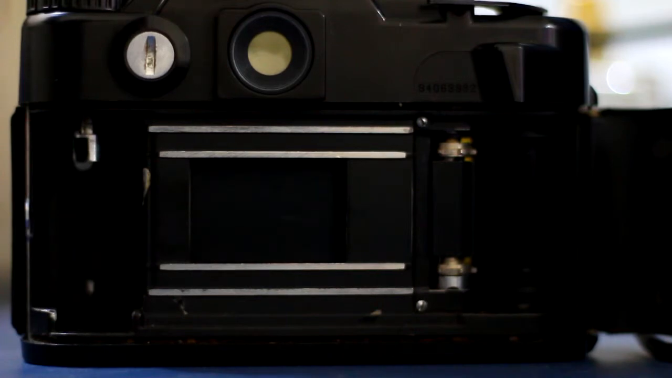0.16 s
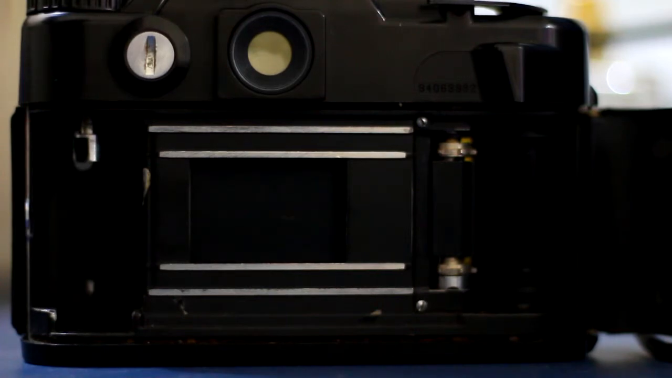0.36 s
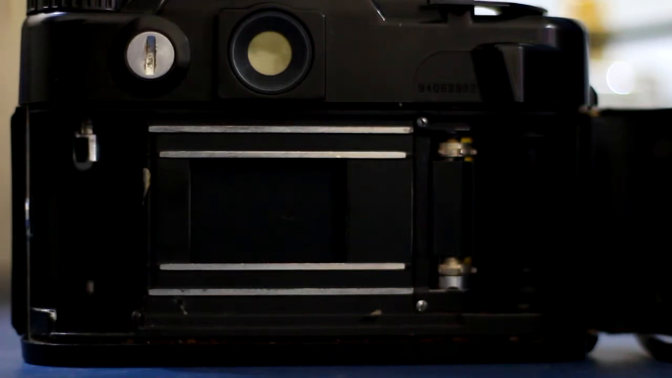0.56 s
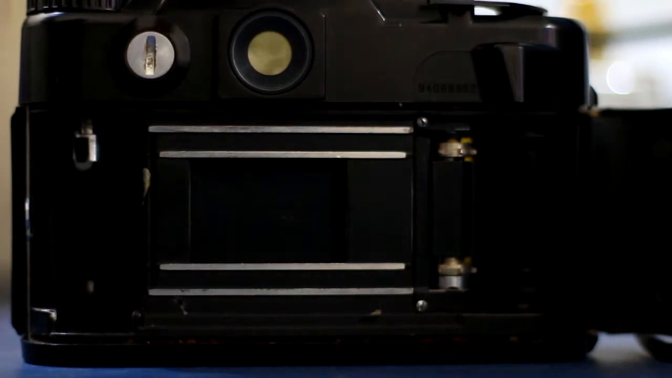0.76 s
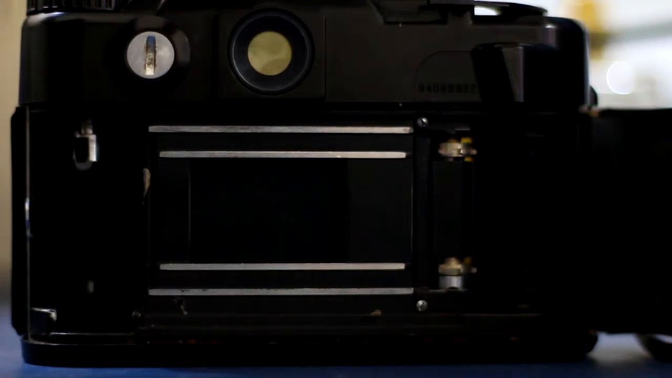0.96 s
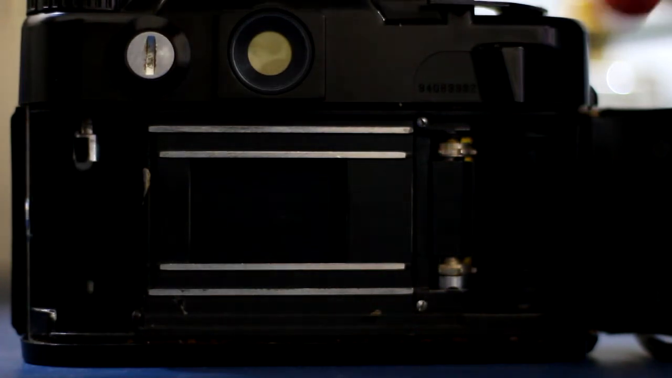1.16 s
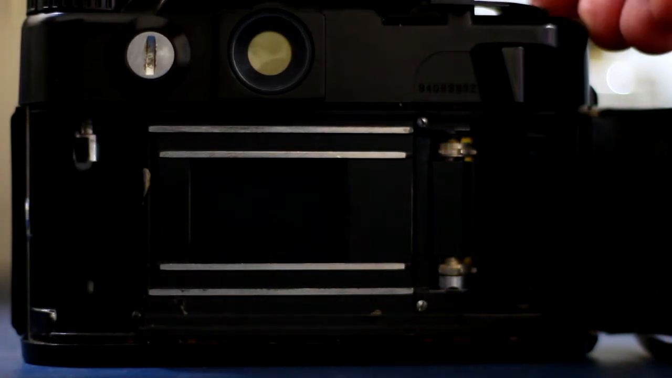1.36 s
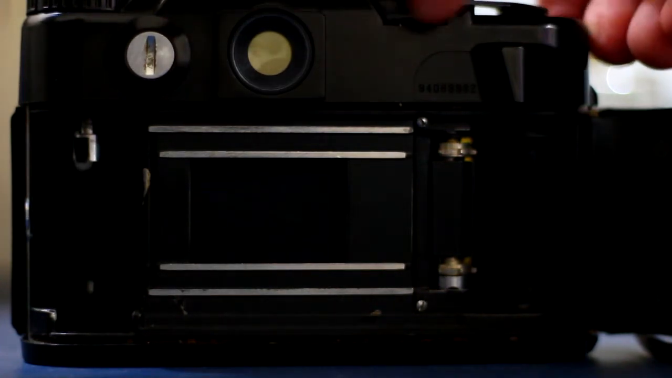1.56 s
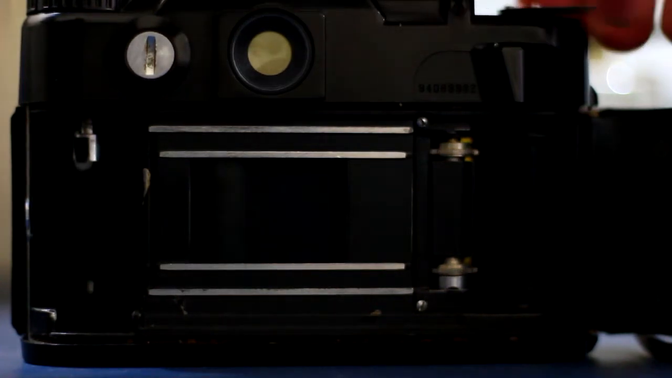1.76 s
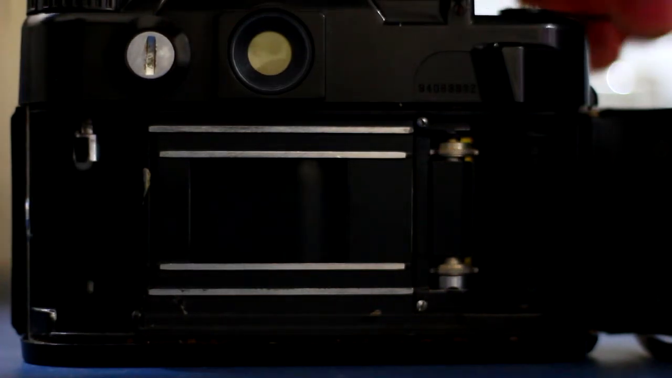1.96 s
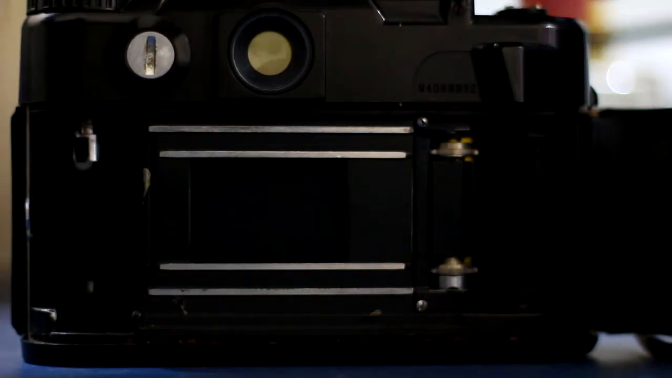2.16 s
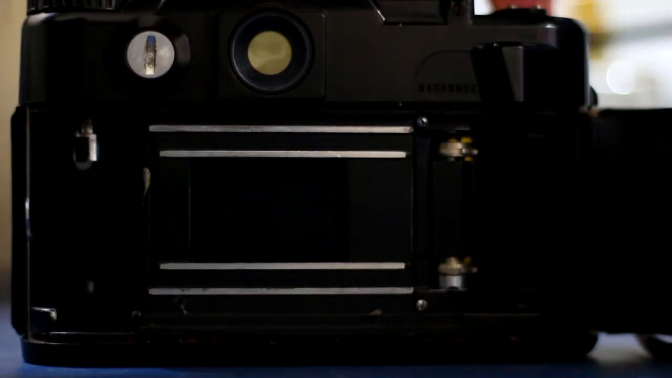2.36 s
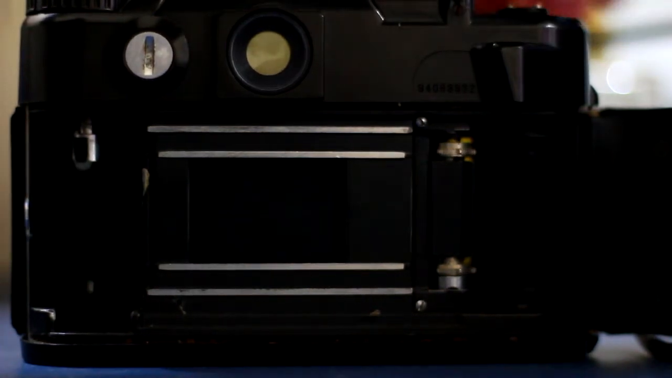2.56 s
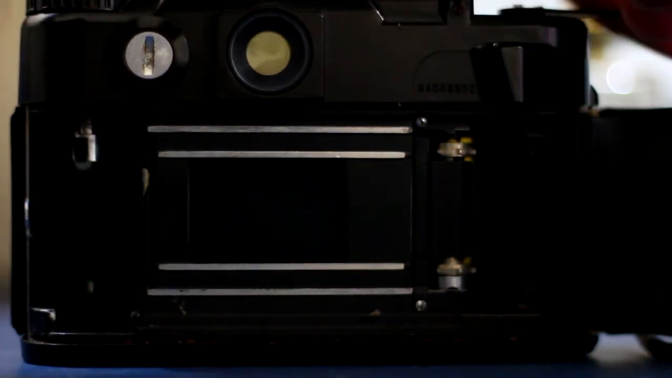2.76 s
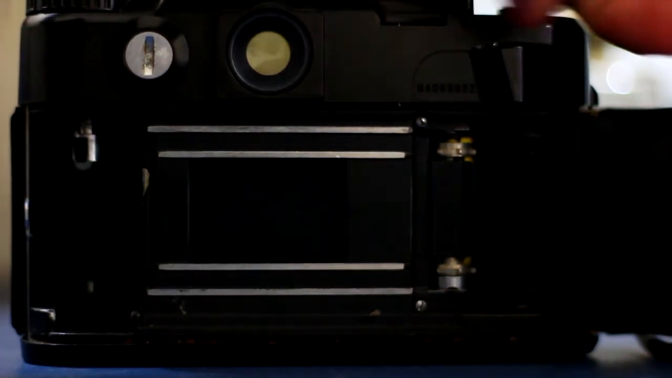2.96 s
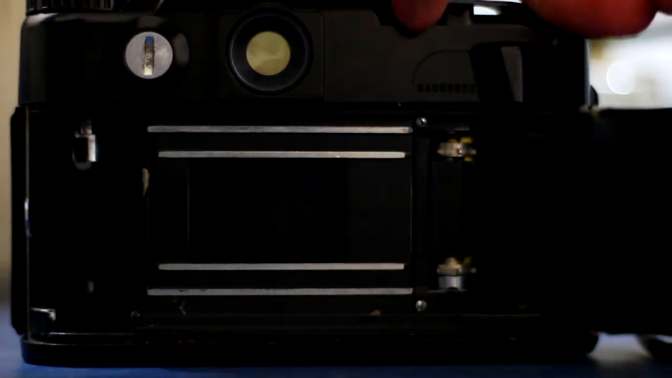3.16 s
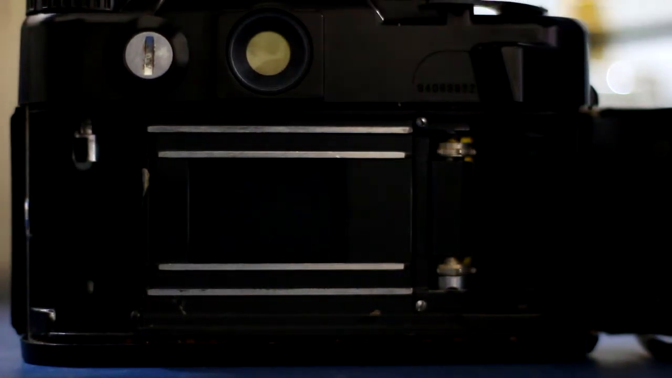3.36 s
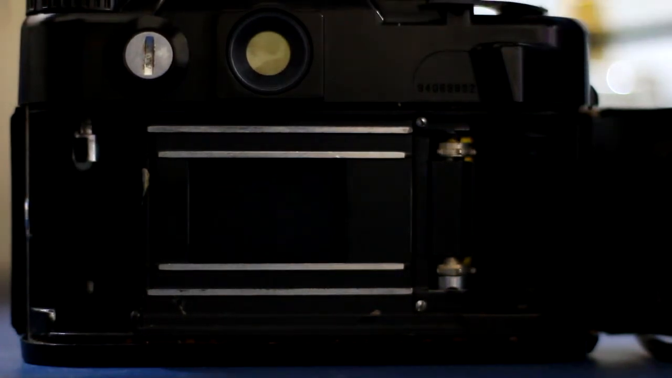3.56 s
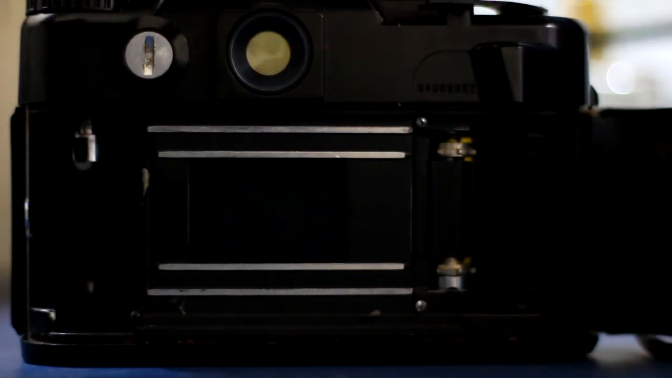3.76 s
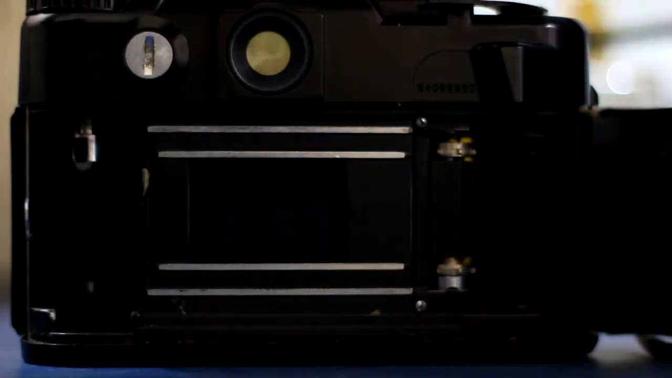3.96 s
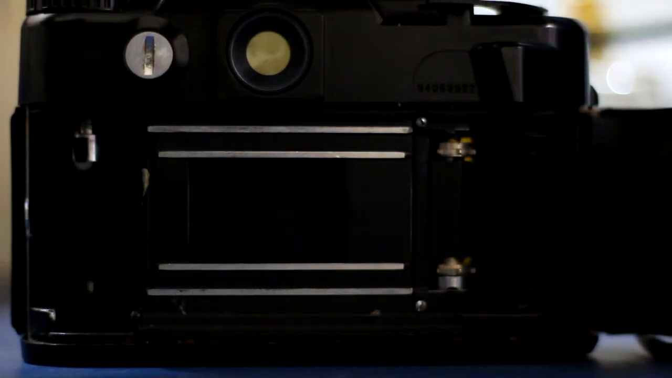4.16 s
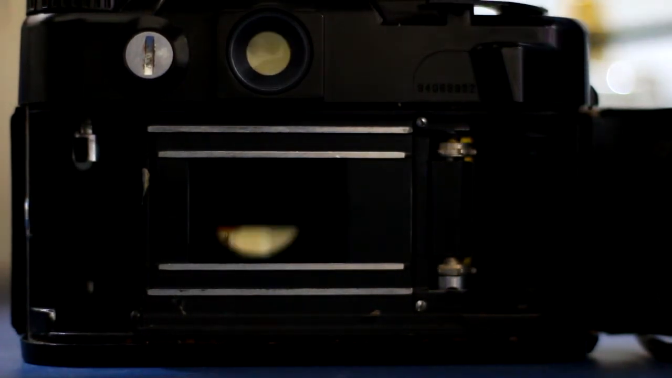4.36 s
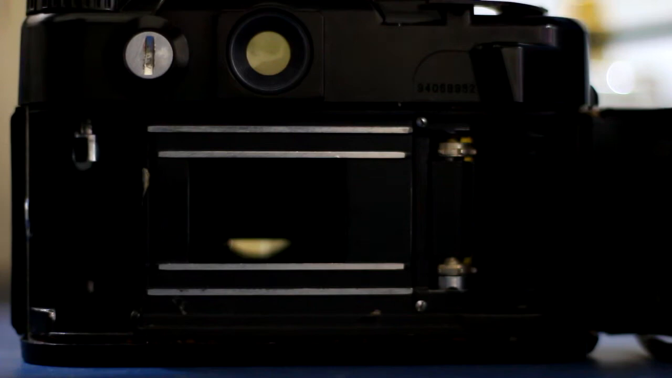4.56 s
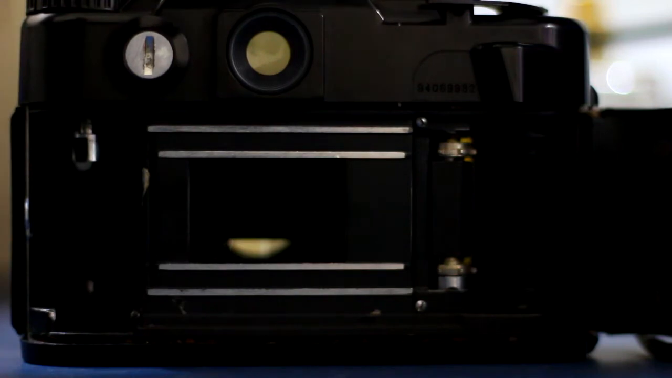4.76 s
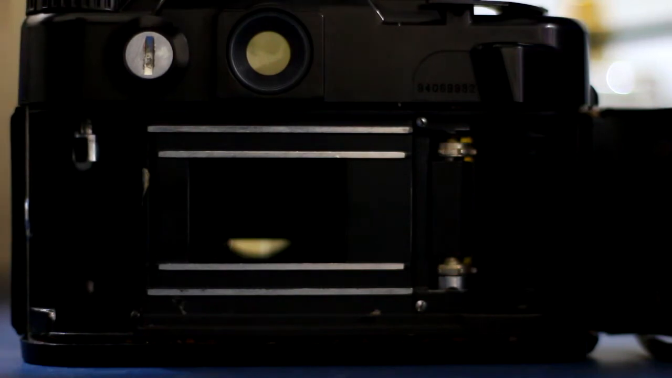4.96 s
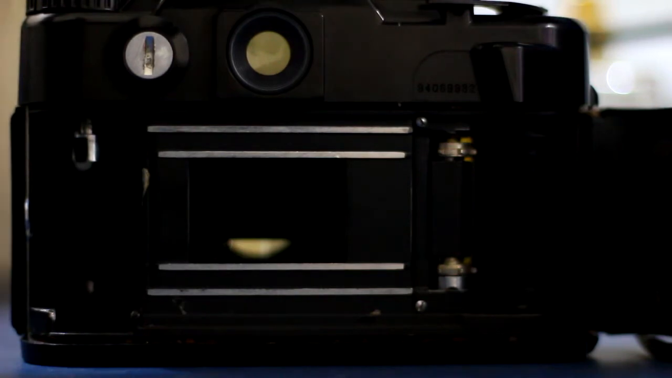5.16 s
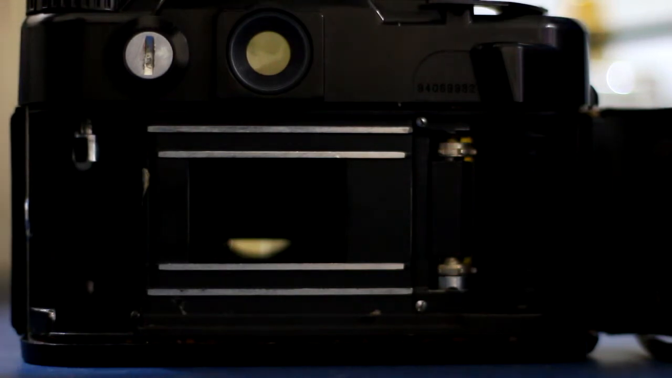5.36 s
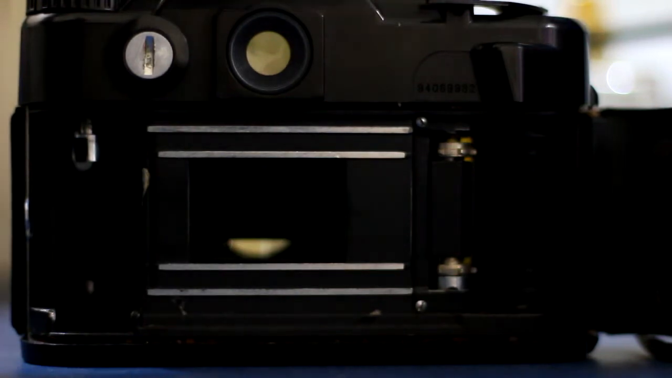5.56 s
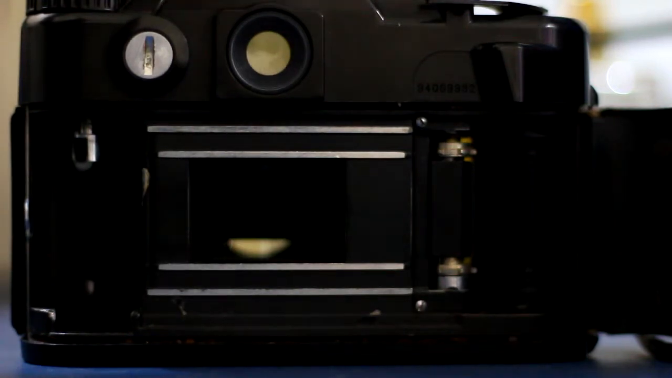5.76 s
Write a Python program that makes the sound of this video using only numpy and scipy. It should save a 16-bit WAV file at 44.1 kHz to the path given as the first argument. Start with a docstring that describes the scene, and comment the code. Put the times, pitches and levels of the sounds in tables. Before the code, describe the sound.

Low room rumble and soft hiss open the scene, with a few faint distant clinks. Close by, a film camera's lever is taken with small clicks and wound in a fast half-second metallic rasp, then returns in separate ticking clicks. After about a second of quiet, the shutter fires a loud, tight volley of clacks with a short room echo, followed by faint ticks and a low hum. Close stereo microphones.

```python
"""Low room rumble and hiss come first, with faint clinks across the room; a close stereo pair hears a film camera
on a table. Its advance lever is wound, a pawl rasping over a fine ratchet, and clicks back tooth by tooth; the
shutter fires a volley of clacks, then a few faint ticks follow as a low hum swells and fades.
Each blow is a burst of noise ringing one metal body; dense, soft grit rings it as parts rub; filtered noise shakes
the table, makes the room tone and forms the echoes."""
import sys
import numpy as np
from scipy import signal
from scipy.io import wavfile

SR = 44100
rng = np.random.default_rng(int(sys.argv[2]) if len(sys.argv) > 2 else 0)


def unload_audio(sound):
    """Save the sound as a 16-bit wav file, at the path given as the first command line argument."""
    columns = np.transpose(np.atleast_2d(sound))
    # keep every value between -1 and 1, then stretch to whole-number steps
    steps = np.round(np.clip(columns, -1, 1) * 32767)
    wavfile.write(sys.argv[1], SR, steps.astype(np.int16))


N = 255780


def amp(db):
    """Gain of a level in dB."""
    return 10 ** (np.asarray(db) / 20)


def rms_one(x):
    """Scale to rms 1."""
    return x / np.sqrt(np.mean(x ** 2, axis=-1, keepdims=True) + 1e-20)


def in_time(rows, outside=None):
    """Read each column of a timed table sample by sample."""
    s, *columns = np.transpose(rows)
    t = np.arange(N) / SR
    return [np.interp(t, s, column, outside, outside) for column in columns]


def at_hz(points, hz):
    """Read a spectrum at one pitch, along a logarithmic frequency axis."""
    table_hz, values = np.array(points).T
    return np.interp(np.log(hz), np.log(table_hz), values)


def held(rows, rise_db, fall_db):
    """Rows of (start, end, levels) rise, hold and fall at fixed dB per second; the loudest counts."""
    t = np.arange(0, N, 64) / SR
    start, end, *levels_db = np.transpose(rows)[:, :, None]
    loss_db = rise_db * np.maximum(start - t, 0) + fall_db * np.maximum(t - end, 0)
    return [np.interp(np.arange(N) / SR, t, np.max(db - loss_db, axis=0)) for db in levels_db]


def drift(rate):
    """Slow random wavering of spread 1: low-passed noise on a coarse time grid."""
    r = np.exp(-80 * np.pi * rate / SR)
    white = rng.standard_normal(N // 40 + 2002)
    slow = signal.lfilter([1], [1, -2 * r, r * r], white)[2000:]
    return np.interp(np.arange(N) / 40, np.arange(len(slow)), rms_one(slow))


def resonance(x, hz, width):
    """Ring one mode: a two-pole band-pass with gain 1 on top."""
    r = np.exp(-np.pi * width / SR)
    poles = [1, -2 * r * np.cos(2 * np.pi * hz / SR), r * r]
    return signal.lfilter([(1 - r * r) / 2, 0, (r * r - 1) / 2], poles, x)


def stereo(mid_side, hz, likeness, balance):
    """Mix two unrelated signals to a pair as alike and as balanced as this pitch asks."""
    alike = np.clip(at_hz(likeness, hz), -1, 1)
    lean_db = at_hz(balance, hz) / 2
    mid = np.sqrt(1 + alike) * mid_side[0]
    side = np.sqrt(1 - alike) * mid_side[1]
    return np.array([(mid + side) * amp(lean_db), (mid - side) * amp(-lean_db)])


# edges of the narrow noise bands: (frequency [Hz])
BAND_EDGES = 22 * 2 ** np.arange(0, 9.7, .4)
# left over right in room tone, echoes and table: (frequency [Hz], balance [dB])
AIR_LEAN = [(60, -5), (240, -4), (950, -5.0), (3770, -0.5), (15000, 1)]


def banded_noise(band_db, likeness, length=N):
    """Stereo noise in narrow bands; band_db(hz) gives each band its gain."""
    out = 0
    white = rng.standard_normal((2, 2, length))   # neighbouring bands take unrelated noise
    for k, (low, high) in enumerate(zip(BAND_EDGES, BAND_EDGES[1:])):
        band = signal.butter(2, [low, high], "band", fs=SR, output="sos")
        pair = signal.sosfilt(band, white[k % 2])
        hz = np.sqrt(low * high)
        out = out + amp(band_db(hz)) * stereo(pair, hz, likeness, AIR_LEAN)
    return out


# spectrum of the room tone: (frequency [Hz], relative level per Hz [dB])
AIR_SPECTRUM = [(12, -40), (20, -7.5), (77, -5.5), (108, -8.5), (224, -7), (281, -5.5), (314, -4),
                (382, -10), (492, -5.5), (599, -9), (913, -9), (1470, -14), (4160, -25), (15200, -38.5),
                (16500, -57)]
# humps in that spectrum: (frequency [Hz], width [Hz], relative level [dB])
AIR_PEAKS = [(87.5, 22, 0.5), (283.1, 16, 1.5), (362, 41, -7.5), (904, 54, -10.5), (1910, 46, -25),
             (4010, 135, -19.5)]
# room tone through time: (time [s], level [dB], extra treble above 1200 Hz [dB])
AIR_IN_TIME = [(0, -44, 2.5), (.6, -44, -0.5), (1.5, -44, -2), (2.5, -45.5, -1.4), (4.1, -45.5, -1.2),
               (4.8, -46, 1.5), (5.2, -48, 1.5), (5.8, -44, -1.5)]
# left-right likeness of the room tone: (frequency [Hz], correlation [-1 to 1])
AIR_ALIKE = [(60, 0.96), (180, 0.84), (550, 0.73), (1650, 0.26), (4970, -0.25), (15000, -0.32)]


def room_tone():
    """Rumble and hiss: noise bands that waver slowly and separately, with a few resonant humps."""
    level_db, treble_db = in_time(AIR_IN_TIME)

    def band_db(hz):
        return at_hz(AIR_SPECTRUM, hz) + treble_db * (hz > 1200) + 1.53 * drift(2.1)

    air = banded_noise(band_db, AIR_ALIKE)
    white = rng.standard_normal((2, N))
    for hz, width, db in AIR_PEAKS:
        air += amp(db) * stereo(resonance(white, hz, width), hz, AIR_ALIKE, AIR_LEAN)
    return amp(level_db) * air / np.sqrt(np.mean(air ** 2))


# low hum: (time [s], level before the left-right lean [dB])
HUM_IN_TIME = [(4.82, -80), (4.87, -57), (5.41, -46), (5.63, -53), (5.68, -80)]
HUM_HZ = 78.9


def hum():
    """A steady low sine swells late and fades, stronger on the right."""
    level_db, = in_time(HUM_IN_TIME)
    tone = np.sqrt(2) * np.sin(2 * np.pi * HUM_HZ * np.arange(N) / SR)
    return amp(level_db) * tone * amp([[-2.3], [1.8]])


# time the echoes take to fall 60 dB: (frequency [Hz], time [s])
ECHO_T60 = [(100, 0.92), (300, 0.49), (1000, 0.35), (3000, 0.4), (7000, 0.5), (11000, 0.31), (16000, 0.38)]
# left-right likeness of blows, table and echoes: (frequency [Hz], correlation [-1 to 1])
BLOW_ALIKE = [(60, 0.74), (180, 1), (550, 0.95), (1650, 0.82), (4970, 0.47), (15000, 0.055)]


def room(x):
    """Echoes as noise that fades in within a millisecond and dies band by band."""
    t = np.arange(SR) / SR
    echoes = banded_noise(lambda hz: -60 * t / at_hz(ECHO_T60, hz), BLOW_ALIKE, length=SR)
    echoes *= np.clip(t / 0.0009, 0, 1)
    echoes /= np.sqrt(np.sum(echoes ** 2) / 2)
    return signal.fftconvolve(x.mean(axis=0, keepdims=True), echoes, axes=1)[:, :N]


# modes of the metal body: (frequency [Hz], least width [Hz],
# relative level struck by winding pawl [dB], by returning lever [dB], by shutter [dB])
BODY_MODES = [(137, 15, -4, -22, -8), (282, 22, -6.5, 3, -1.5), (360.8, 36, 1.5, 17, 14),
              (503, 91, -11.5, 0, 3.5), (583, 20, -9, -28, -1.5), (1080, 107, -0.5, -2, -5.5),
              (1156, 45, 0.5, -9, 1.5), (1387, 107, -6, 4.5, -6.5), (1700, 60, -1, 2, -29),
              (1790, 130, -6.5, 0.5, -24), (2504, 150, -0.5, -5, 7.5), (2905, 37, 7.5, 13.5, -26),
              (3300, 40, -6.5, 4, -36), (4125, 160, -7.5, -9, -3.5), (4370, 59, -2.5, -6, -1),
              (4855, 110, -10, 7, -14), (6140, 40, -0.5, -15, 0), (6210, 350, -3.5, -22, -2.5),
              (6990, 83, -15, -20, -19), (8900, 230, -23, -3, -32), (9580, 1200, -15, -8.5, -23),
              (12350, 630, -6, -24, -31), (13960, 630, -26, -14, -27)]
PAWL, LEVER, CURTAIN = 0, 1, 2   # which of the three level columns
# broad part of a blow: (frequency [Hz], relative level [dB])
BROAD_CRACK = [(250, -10), (800, -11), (1600, -11), (2800, 2.5), (5000, -9), (8000, -3.5), (11500, -14),
               (15500, -17)]
# registers click, thud, knock, ring, edge: (low [Hz], high [Hz])
REGISTERS = [3600, 7000], [100, 700], [700, 2200], [2200, 3600], [7000, 16000]
# left over right in the blows: (frequency [Hz], balance [dB])
BLOW_LEAN = [(60, -8), (240, -3.5), (950, -2.5), (3770, 0), (15000, -1)]


def body(force, levels_db, striker, spread_db):
    """Metal modes and a broad crack answer forces (2 x blows x time); each register is set to its level."""
    parts = [(hz, max(width, hz / 25), db[striker]) for hz, width, *db in BODY_MODES]
    parts += [(hz, .5 * hz, db) for hz, db in BROAD_CRACK]
    luck_db = spread_db * rng.standard_normal((force.shape[1], len(parts), 1))
    out = 0
    for (low, high), level_db in zip(REGISTERS, levels_db):
        register = 0
        for k, (hz, width, db) in enumerate(parts):
            if low <= hz < high:
                strength = (-1) ** k * amp(db + luck_db[:, k]) * np.sqrt(width)
                ringing = rms_one(resonance(force, hz, width))
                register = register + strength * stereo(ringing, hz, BLOW_ALIKE, BLOW_LEAN)
        # low registers carry no hiss
        register = signal.lfilter(*signal.butter(2, min(1.7 * high, 20000), fs=SR), register)
        loudness = np.sqrt(np.mean(register ** 2, axis=(0, 2), keepdims=True))
        out = out + amp(level_db) * register / loudness
    return out


def blows(s, levels_db, chatter_ms, striker, spread_db):
    """Each blow is a noisy chatter that swells and dies, rung through the body (levels: blows x registers)."""
    length = 2000   # samples
    chatter_ms = np.maximum(chatter_ms * np.ones(len(s)), .2)[:, None]
    age = 1000 * np.arange(length) / SR / chatter_ms
    force = rng.standard_normal((2, len(s), length)) * age ** 1.12 * np.exp(-age)
    sounds = body(force, levels_db.T[:, :, None], striker, spread_db)
    sounds = amp(-18.5) * np.sqrt(chatter_ms) * sounds   # longer chatter, more energy
    out = np.zeros((2, N))
    for k, at in enumerate(np.round(s * SR).astype(int)):
        out[:, at:at + length] += sounds[:, k]
    return out


def clacks(table, colour_db, striker, spread_db):
    """Single blows: brightness tilts the registers about the ring; the thud has its own level."""
    s, db, tilt, thud_db, chatter_ms = np.transpose(table)
    centres = np.sqrt(np.prod(REGISTERS, axis=1))
    octaves = np.log2(centres / centres[3])
    levels_db = db[:, None] + tilt[:, None] * octaves + colour_db
    levels_db[:, 1] = thud_db
    return blows(s, levels_db, chatter_ms, striker, spread_db)


# faint clinks across the room, before the distance gains in scene():
# (time [s], level [dB], brightness [dB per octave], thud [dB], chatter [ms])
FAR_CLINKS = [(0.1282, -45.5, -1.2, -60, 0.94), (0.7422, -48, -0.07, -64, 1.9),
              (0.7573, -43, -2.8, -64, 1.5)]
# their offsets: (click, unused, knock, ring, edge [dB])
FAR_TINT = [2.3, 0, -1, 1, -11]


def far_clinks():
    """Weak blows across the room, rung by the same metal modes."""
    return clacks(FAR_CLINKS, FAR_TINT, PAWL, spread_db=2.0)


# hand or blow shaking the table:
# (start [s], end [s], relative rocking level [dB], relative top drumming level [dB])
TABLE_SHAKES = [(1.48, 1.52, -65, -47), (1.7, 1.84, -42, -41.5), (1.9, 2.05, -48, -41),
                (2.15, 2.17, -42, -41.5), (2.3, 2.31, -45, -36), (2.52, 2.54, -38.5, -39),
                (2.8, 3.18, -55, -45.5), (4.18, 4.19, -47.5, -41.5), (4.35, 4.37, -32, -24),
                (4.42, 4.52, -45, -34.5), (4.69, 4.72, -43.5, -42.5), (4.86, 4.93, -54.5, -49),
                (5.04, 5.05, -58, -44), (5.15, 5.2, -53, -52)]
# table modes: (frequency [Hz], width [Hz], relative level [dB])
TABLE_MODES = [(80.3, 21, -4.5), (113.6, 11, -3), (139.2, 7.1, 0.5), (197.4, 27, -6), (282.2, 20, -5),
               (330, 29, -7.5), (380.6, 33, -2.5), (543, 110, -6.5)]


def table_shaking():
    """Hand and blows shake the table: noise rings its modes, rocking below 170 Hz and drumming above."""
    rock_db, drum_db = held(TABLE_SHAKES, rise_db=289, fall_db=245)
    shaking = rng.standard_normal((2, N))
    out = np.zeros((2, N))
    for hz, width, db in TABLE_MODES:
        mode = rms_one(resonance(resonance(shaking, hz, width), hz, 3 * width))
        level_db = (rock_db if hz < 170 else drum_db) + db - 8.5
        out += amp(level_db) * stereo(mode, hz, BLOW_ALIKE, AIR_LEAN)
    return out


# parts rubbing outside the winding stroke:
# (start [s], end [s], relative grind level [dB], relative bright scrape level [dB])
RUBBING = [(1.634, 1.71, -50.5, -50.5), (2.57, 2.66, -53, -62), (2.68, 2.8, -47, -48),
           (2.81, 3.04, -47.5, -46.5), (3.05, 3.178, -48.5, -52), (4.18, 4.2, -52, -66),
           (4.332, 4.42, -44, -47.5), (4.5, 4.53, -40, -42), (4.6, 4.7, -54, -59), (4.8, 4.87, -53, -54),
           (4.93, 4.94, -51.5, -55), (5.04, 5.06, -55, -57)]
# grit offset in each register: (click, thud, knock, ring, edge [dB])
GRIT_TINT = [-7.5, -16, -6, -3, -8]
# winding stroke: (time [s], tooth level [dB], extra ring of the tooth [dB], relative grind level [dB])
STROKE = [(1.72, -28.5, -0.5, -41), (1.76, -30, 5, -35), (1.82, -31, -1, -35.5), (1.9, -30.5, 4, -42),
          (2.0, -29, 5, -35), (2.05, -29, -1.5, -38), (2.1, -28.5, -6, -52), (2.16, -31, -1.5, -40),
          (2.25, -27, 1, -41.5), (2.3, -40, 0.1, -56)]
WIND_SCRAPE_DB = 1.1   # scrape over grind in the stroke


def gear_grit():
    """Dense, soft random grains between the gears ring the body while parts rub."""
    winding_db = in_time(STROKE, -120)[2]
    rubbing_db = held(RUBBING, rise_db=256, fall_db=205)
    grind_db, scrape_db = np.maximum(rubbing_db, [winding_db, winding_db + WIND_SCRAPE_DB])
    shape = 2, 1, N
    struck = rng.random(shape) < 7000 / SR   # 7000 grains a second
    size = amp(5.5 * np.minimum(rng.exponential(1, shape), 5))
    grit = struck * size * rng.choice([-1, 1], shape)
    grit = signal.lfilter([1], [1, -.45], grit + 1e-18)   # softened grains
    levels_db = np.array([scrape_db, grind_db, grind_db, grind_db, scrape_db])
    return body(grit, levels_db + np.reshape(GRIT_TINT, (-1, 1)), PAWL, spread_db=0)[:, 0]


# how far the lever has turned: (time [s], ratchet teeth passed [count])
LEVER_TRAVEL = [(1.7255, 0), (1.7895, 7), (1.8242, 10), (1.902, 16), (1.9185, 17), (1.956, 20),
                (2.0596, 29), (2.0784, 30), (2.1284, 33), (2.1995, 38), (2.232, 40)]
# tooth offsets: (click, thud, knock, ring, edge [dB])
TOOTH_TINT = [-1, -9, -6.5, -0.5, 0.5]
TEETH, TOOTH_SCATTER_DB, TOOTH_JITTER_S, TOOTH_CHATTER_MS = 41, 2.0, .0004, 1.35


def ratchet():
    """The pawl drops once for every tooth that the lever passes, a little unevenly."""
    turn_s, teeth = np.transpose(LEVER_TRAVEL)
    s, db, ring_db, _ = np.transpose(STROKE)
    luck = rng.standard_normal((TEETH, 6))
    at = np.interp(np.arange(TEETH), teeth, turn_s)
    levels_db = np.interp(at, s, db)[:, None] + TOOTH_TINT + TOOTH_SCATTER_DB * luck[:, 1:]
    levels_db[:, 3] += np.interp(at, s, ring_db)
    at = at + TOOTH_JITTER_S * luck[:, 0]
    return blows(at, levels_db, TOOTH_CHATTER_MS, PAWL, spread_db=5.5)


# single blows of the lever:
# (time [s], level [dB], brightness [dB per octave], thud [dB], chatter [ms])
LEVER_BLOWS = [(1.594, -56, 4.5, -46, 1.4), (1.6299, -53, 0.5, -29, 1.8), (1.6607, -36.5, -2, -45, 2.2),
               (1.6663, -35.5, 2.5, -35, 2.8), (1.6798, -25.5, -2, -47, 2.1), (1.6886, -35, 3.5, -48, 2.3),
               (2.1981, -26.5, -3.5, -33, 1.6), (2.2026, -31.5, 3, -45, 1.5),
               (2.2528, -28.5, 0.5, -38, 1.4), (2.2829, -30.5, 0, -49, 2.5),
               (2.2922, -38.5, 3.5, -26.5, 3.4), (2.304, -29.5, 0, -39, 1.6), (2.3277, -47, 3.5, -34, 0.84),
               (2.491, -49, -13, -46, 2.5), (2.585, -41, -0.5, -62, 0.81), (2.61, -39.5, 2.5, -30, 1.2)]
# their offsets: (click, unused, knock, ring, edge [dB])
LEVER_TINT = [-3.1, 0, -0.81, 3.1, 0.1]


def lever_clacks():
    """Single blows of the lever around the winding stroke ring the body."""
    return clacks(LEVER_BLOWS, LEVER_TINT, PAWL, spread_db=4.0)


# lever sliding back, one click a tooth: (time [s], level [dB], extra knock [dB])
RETURN_CLICKS = [(2.657, -25.5, 6.5), (2.6842, -25, -4), (2.7187, -27, -7), (2.754, -26.5, -3),
                 (2.789, -22, -2), (2.8254, -24.5, 3), (2.8622, -26.5, -3), (2.9016, -22.5, -3),
                 (2.9492, -24.5, 1.5), (2.9819, -23.5, -2), (3.0137, -24, 0.5), (3.053, -22, 0.5),
                 (3.1061, -23, 2.5), (3.1515, -22.5, -2.5), (3.176, -38.5, 11)]
# first click's offsets: (click, thud, knock, ring, edge [dB])
RETURN_TINT = [0.1, -10.5, -10.5, -0.7, -0.5]
# how the offsets change as clicks grow heavier: (click, thud, knock, ring, edge [dB per s])
RETURN_DRIFT = [-21, 13, 13.5, 0, -7]
RETURN_SCATTER_DB, RETURN_CHATTER_MS = 1, 1.52


def lever_return():
    """Evenly short clicks whose weight shifts downward as the lever comes home."""
    s, db, knock_db = np.transpose(RETURN_CLICKS)
    levels_db = db[:, None] + RETURN_TINT + np.outer(s - s[0], RETURN_DRIFT)
    levels_db += RETURN_SCATTER_DB * rng.standard_normal((len(s), 5))
    levels_db[:, 2] += knock_db
    return blows(s, levels_db, RETURN_CHATTER_MS, LEVER, spread_db=4.0)


# parts settling: (time [s], level [dB], brightness [dB per octave], thud [dB], chatter [ms])
SETTLING = [(4.7708, -53, 2, -48, 2.3), (4.8086, -38.5, -1.2, -40, 3.3), (4.8566, -44.5, -8, -43, 2.3),
            (4.9326, -41, -3.5, -32.5, 1.9), (5.0133, -45, -7, -41, 0.79),
            (5.0429, -34.5, -11, -25.5, 1.02), (5.1174, -49, -17.5, -27.5, 1.56)]
# their offsets: (click, unused, knock, ring, edge [dB])
SETTLING_TINT = [0.1, 0, -1.4, -1.5, -4]


def settling_ticks():
    """Parts settle after the shot with faint blows on the body."""
    return clacks(SETTLING, SETTLING_TINT, CURTAIN, spread_db=2.5)


# button, mirror, curtain and bounces:
# (time [s], level [dB], brightness [dB per octave], thud [dB], chatter [ms])
SHUTTER_BLOWS = [(4.1748, -45, -5, -36, 1.6), (4.186, -44, -5, -68, 3.8), (4.1967, -36, -2.5, -45, 1.9),
                 (4.2792, -31, -4, -45, 1.2), (4.3303, -18, -1.5, -13, 2.8), (4.343, -15, -3, -20, 4.6),
                 (4.3505, -14, 0.1, -14, 2.1), (4.3622, -9.5, -1.5, -5.5, 1.3),
                 (4.3848, -5, 2.5, -28, 0.63), (4.3938, -16, 5, -31, 0.39), (4.4078, -37, -8, -38, 0.74),
                 (4.4247, -12.5, -0.8, -44, 1.1), (4.4444, -36, 3, -40, 1.3), (4.456, -26.5, 0, -41, 4.5),
                 (4.4724, -27, 4, -45, 1.6), (4.5136, -28.5, -2.5, -47, 1.3)]
# their offsets: (click, unused, knock, ring, edge [dB])
SHUTTER_TINT = [-0.7, 0, 0, -1.8, -4]


def shutter():
    """Button, mirror and curtain strike the body in a volley of clacks, then bounce."""
    return clacks(SHUTTER_BLOWS, SHUTTER_TINT, CURTAIN, spread_db=4.0)


ROOM_DB, FAR_DRY_DB, FAR_WET_DB = -6.5, 4, 10.5   # echo level; far clinks direct and into the echoes


def scene():
    """Camera and table close to the pair, faint clinks far off, all in the room over its tone."""
    background = room_tone() + hum()
    far = far_clinks()
    lever = ratchet() + lever_clacks() + lever_return()
    camera = table_shaking() + gear_grit() + lever + settling_ticks() + shutter()
    echoes = room(camera + amp(FAR_WET_DB) * far)
    return background + amp(FAR_DRY_DB) * far + camera + amp(ROOM_DB) * echoes


CUTOFF_HZ = 16150


def record(dry):
    """Peaks beyond 0.93 are flattened, then a steep low-pass cuts the top."""
    low_pass = signal.cheby2(22, 60, CUTOFF_HZ, fs=SR, output="sos")
    return signal.sosfilt(low_pass, np.clip(dry, -.93, .93))


dry = scene()
out = record(dry)
unload_audio(out)
```